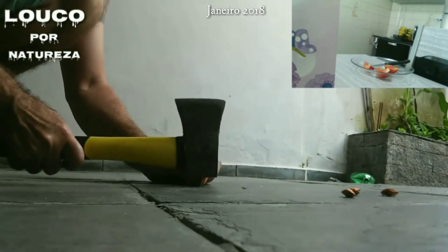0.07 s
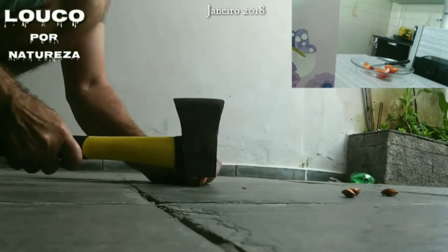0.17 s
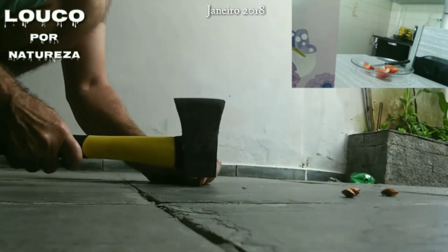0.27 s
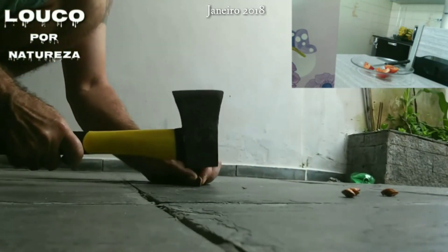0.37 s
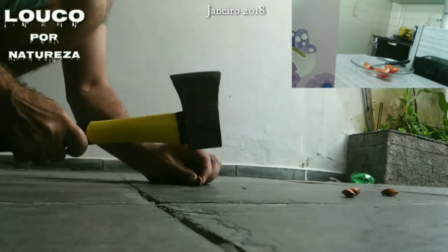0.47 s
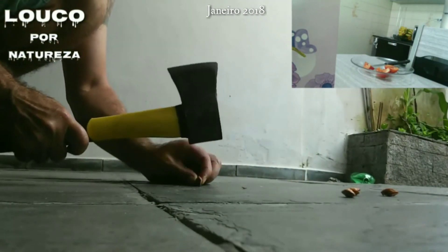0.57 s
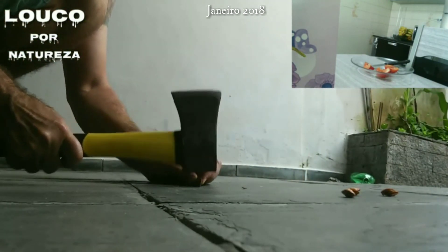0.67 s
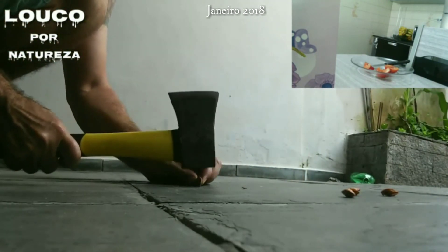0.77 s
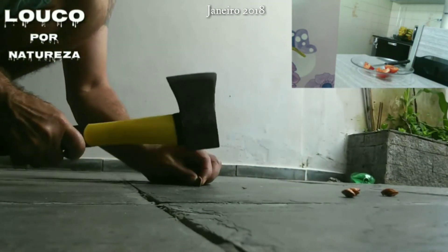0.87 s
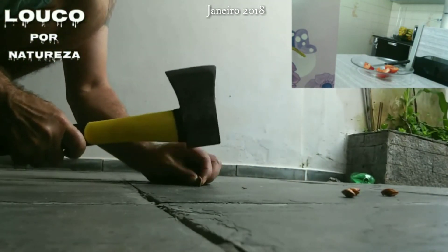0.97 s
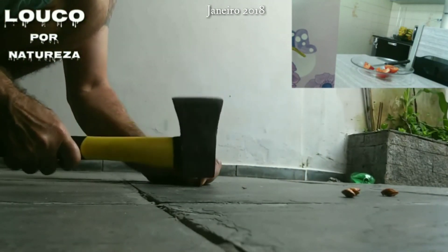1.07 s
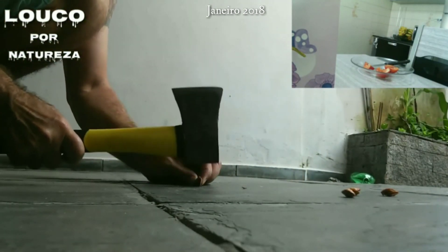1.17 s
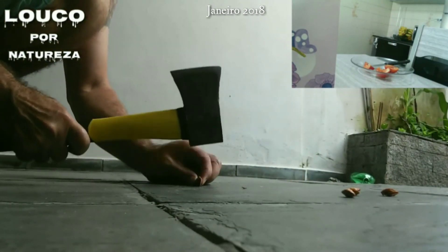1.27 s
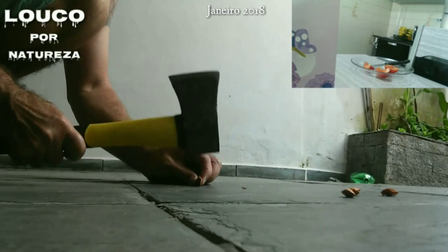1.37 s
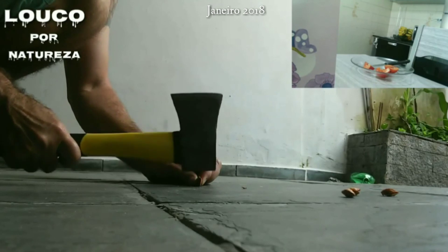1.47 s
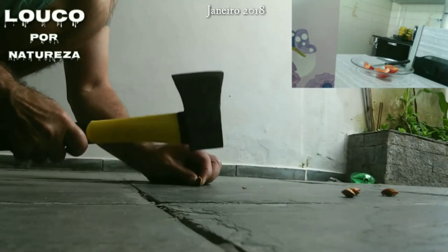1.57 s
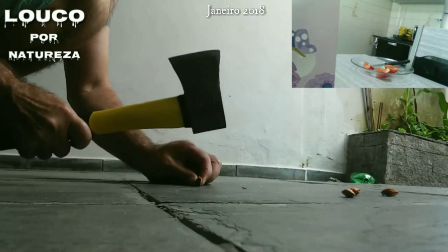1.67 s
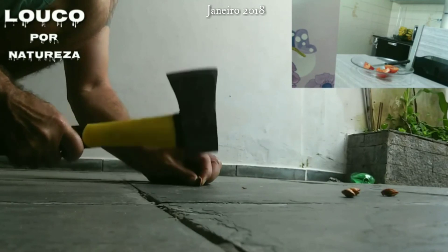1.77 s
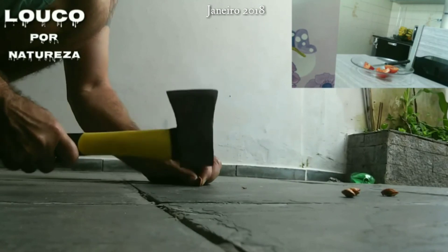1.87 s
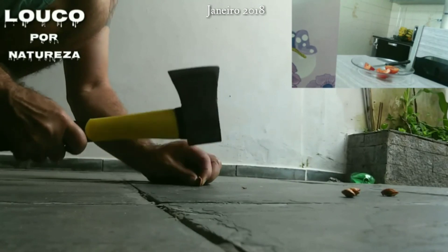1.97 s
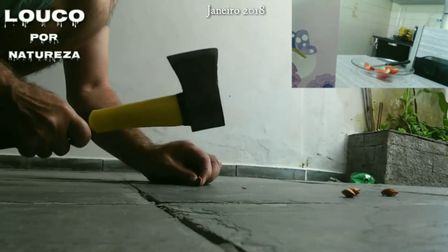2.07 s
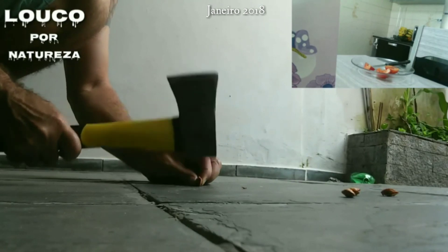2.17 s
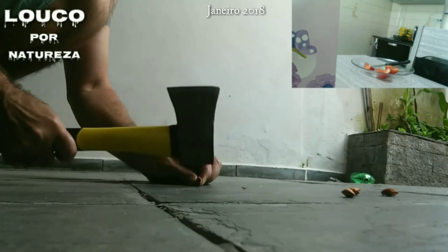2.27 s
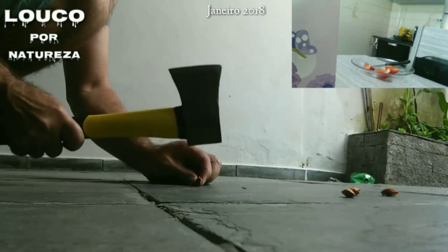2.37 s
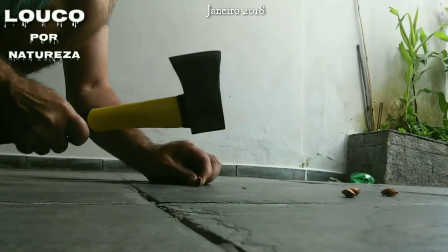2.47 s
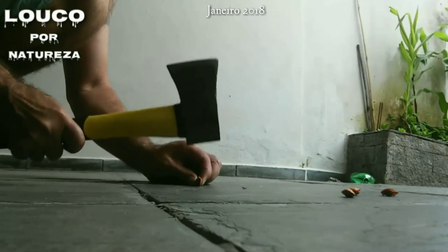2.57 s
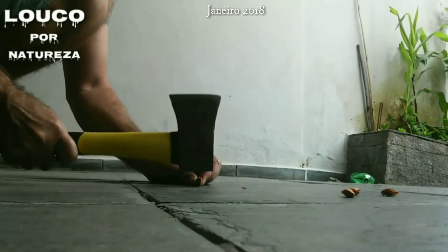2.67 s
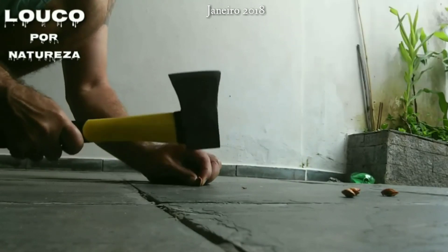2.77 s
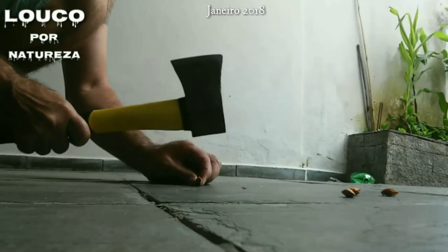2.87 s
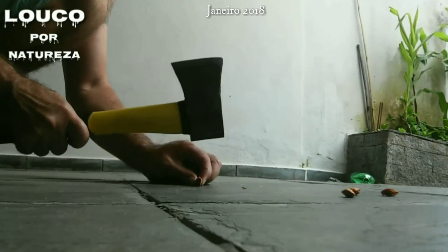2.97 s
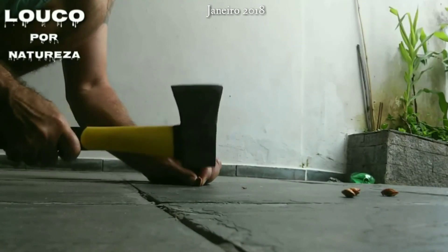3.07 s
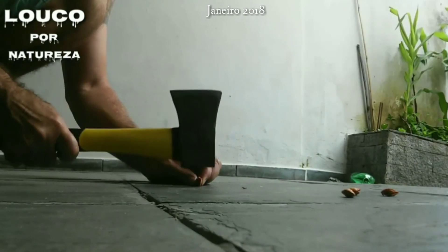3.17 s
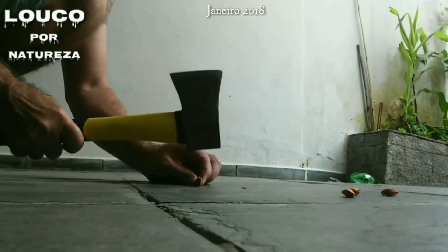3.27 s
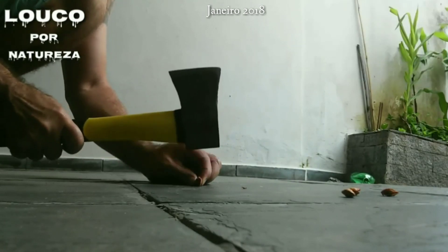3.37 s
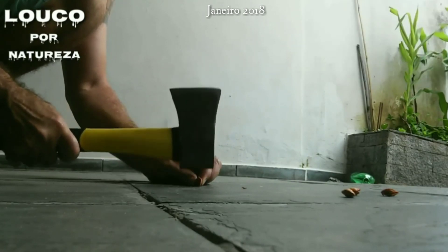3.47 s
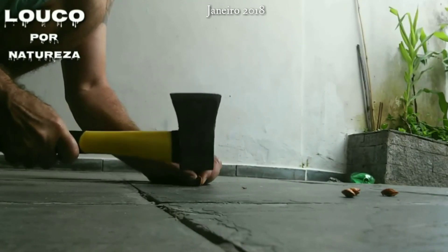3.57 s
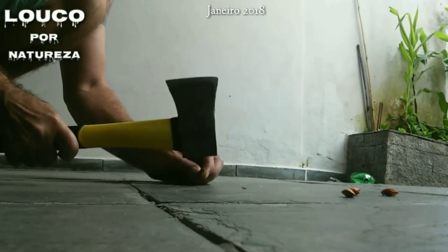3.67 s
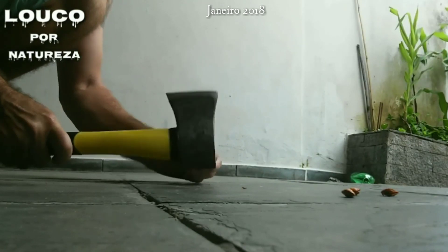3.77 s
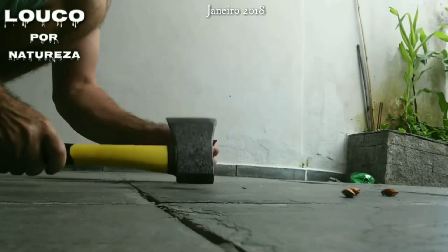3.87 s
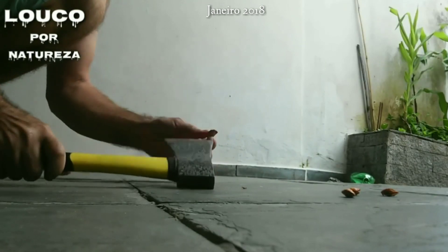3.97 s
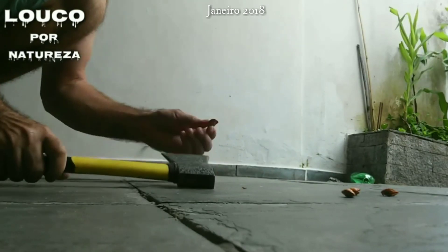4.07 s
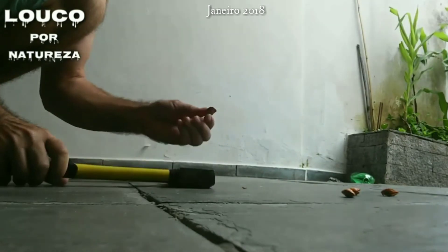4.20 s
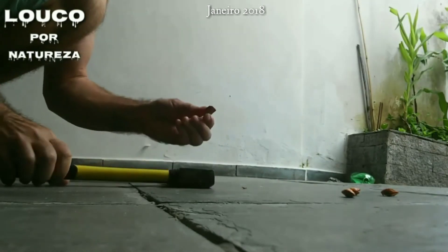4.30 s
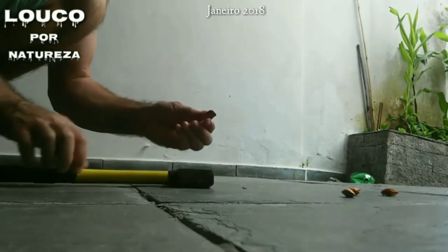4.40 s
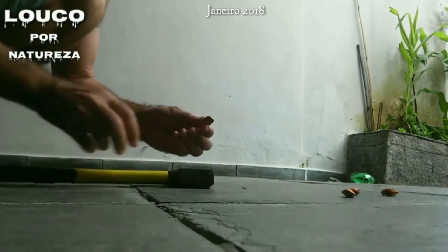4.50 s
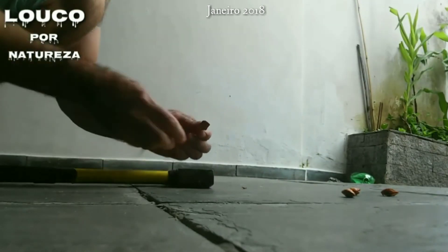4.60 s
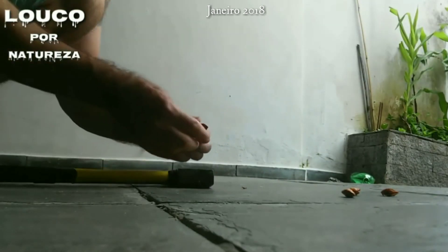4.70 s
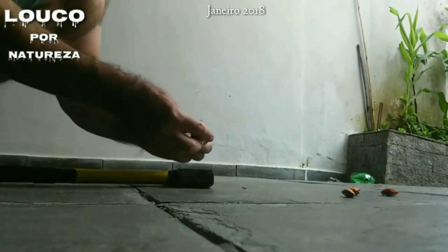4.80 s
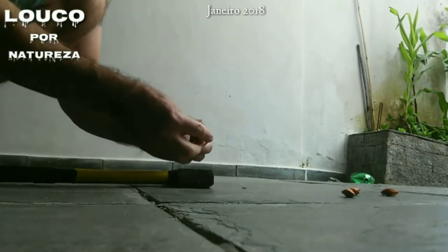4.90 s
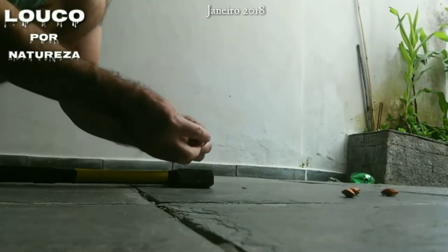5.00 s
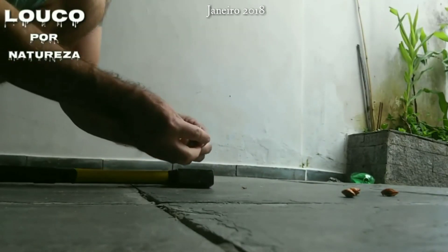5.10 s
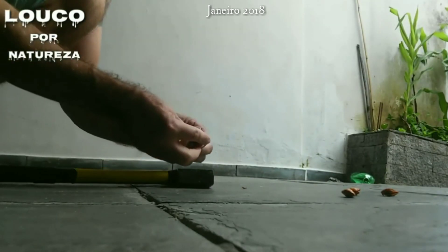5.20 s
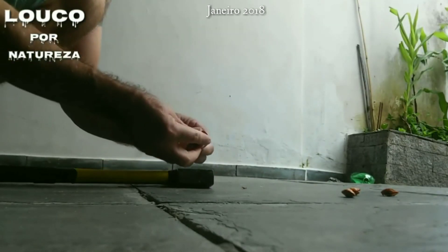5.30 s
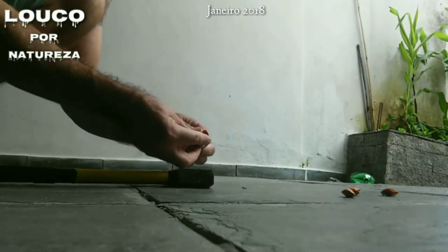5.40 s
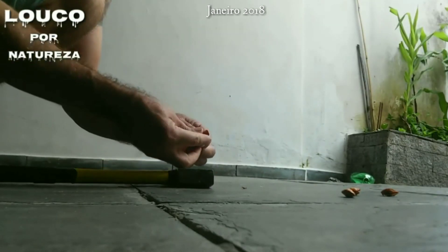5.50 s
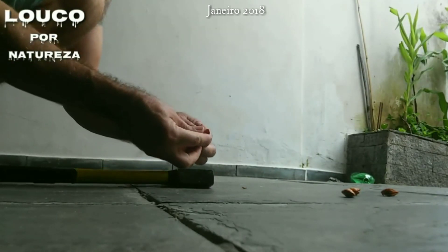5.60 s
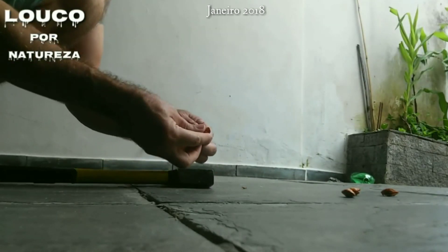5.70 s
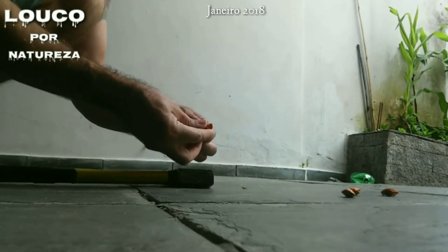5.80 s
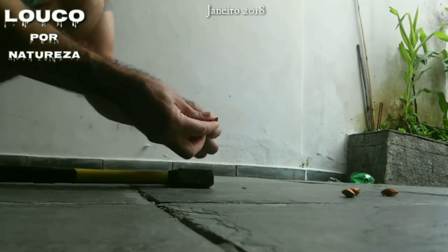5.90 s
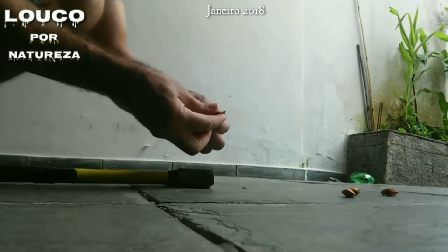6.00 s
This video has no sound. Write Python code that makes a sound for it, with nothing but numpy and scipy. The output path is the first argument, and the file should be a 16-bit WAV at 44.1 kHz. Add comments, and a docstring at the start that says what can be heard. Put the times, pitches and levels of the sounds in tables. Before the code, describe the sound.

A hatchet taps a fruit stone on tile, harder until the shell cracks, then is laid down with a steel clang.

```python
"""A small walled yard, one microphone near the tiled floor. A distant drone hums and fades away early on.
Close by, a hatchet's butt taps a fruit stone seven times: the slab knocks, the shell clicks, the walls
answer. The taps grow harder until the shell cracks under the fifth and sixth; the last is light.
Fingers pick at the shell. Then the hatchet is laid down: its steel head clangs flat on the tile and
chatters, and the handle knocks and rocks to rest."""
import sys
import numpy as np
from scipy import signal
from scipy.fft import rfft, irfft
from scipy.io import wavfile
from scipy.ndimage import uniform_filter1d, minimum_filter1d

SR = 44100
rng = np.random.default_rng(int(sys.argv[2]) if len(sys.argv) > 2 else 0)


def unload_audio(sound):
    """Save the sound as a 16-bit wav file, at the path given as the first command line argument."""
    columns = np.transpose(np.atleast_2d(sound))
    # keep every value between -1 and 1, then stretch to whole-number steps
    steps = np.round(np.clip(columns, -1, 1) * 32767)
    wavfile.write(sys.argv[1], SR, steps.astype(np.int16))


N = 266760
TIME, SCENE_HZ = np.arange(N) / SR, np.fft.rfftfreq(N, 1 / SR)
SIZE = 65536  # samples in one event with its echo
AGE, HZ = np.arange(SIZE) / SR, np.fft.rfftfreq(SIZE, 1 / SR)


def amp(db):
    """Decibels to gain."""
    return 10 ** (np.asarray(db) / 20)


def unit(x):
    """Scaled to rms 1."""
    return x / np.sqrt(np.mean(x ** 2) + 1e-20)


def burst(x):
    """Scaled to the energy of 8 ms at rms 1."""
    return x * np.sqrt(.008 * SR / np.sum(x ** 2))


def along(points, hz):
    """A curve through (Hz, value) points on a log frequency axis."""
    freqs, values = np.transpose(points)
    return np.interp(np.log(hz + 1), np.log(freqs), values)


def add(track, s, x):
    """Mix x into the track from time s."""
    part = track[round(s * SR):][:len(x)]
    part += x[:len(part)]


def resonance(hz, centre_hz, width_hz):
    """Response of one damped mode."""
    return 1j * hz * width_hz / (centre_hz ** 2 - hz ** 2 + 1j * hz * width_hz)


def lowpass(hz, cutoff_hz, order):
    """Treble roll-off; a softer contact lasts longer and has a lower cutoff."""
    return 1 / np.sqrt(1 + (hz / cutoff_hz) ** (2 * order))


def filtered(x, gain):
    """x through the causal filter that has this gain; x = [1.] is a single impulse."""
    cepstrum = irfft(np.log(np.maximum(abs(gain), 1e-6)))
    cepstrum[1:SIZE // 2] *= 2
    cepstrum[SIZE // 2 + 1:] = 0
    return irfft(rfft(x, SIZE) * np.exp(rfft(cepstrum)))


def ring(modes):
    """Damped modes, in new phases every time."""
    return sum(amp(db - 60 * AGE / t60) * np.sin(2 * np.pi * (hz * AGE + rng.random()))
               for hz, db, t60 in modes)


def noise(gain):
    """Steady noise of rms 1, coloured by a gain over SCENE_HZ."""
    return unit(irfft(rfft(rng.standard_normal(N)) * gain, N))


def fading(db, hold_s, fade_db_per_s):
    """A gain of db that falls steadily after hold_s."""
    return amp(db - fade_db_per_s * np.maximum(TIME - hold_s, 0))


# The air around the microphone. Each row: frequency in Hz, relative level in dB.
AIR_SPECTRUM = [(25, -11), (75, 3), (150, -4), (300, -11.5), (520, -10.5), (800, -13.5), (1300, -21.5),
                (4000, -29.5), (15000, -24.5)]

def still_air():
    """The faint, low noise of the empty yard."""
    return amp(-71.5) * noise(amp(along(AIR_SPECTRUM, SCENE_HZ)))


# The far-off hum, dipping and swelling twice. Each row: time in seconds, level in dB.
HUM_LEVELS = [(0.0, -35), (0.142, -51), (0.366, -34.5), (0.516, -44.5), (0.738, -38), (0.888, -51.5),
              (0.92, -61.5)]
# The rush that comes with it. Each row: frequency in Hz, relative level in dB.
RUSH_SPECTRUM = [(76, -27), (130, 0), (305, -7.5), (337, -12.5), (512, -5.5), (612, -10.5), (1090, -16.5),
                 (1330, -30.5), (1470, -20.5), (1790, -29), (2510, -25.5), (3250, -30), (5670, -32),
                 (6380, -37.5), (15000, -51)]

def drone():
    """In the distance a wavering hum, a rumble and a rush die away."""
    times, levels_db = np.transpose(HUM_LEVELS)
    hum_gain = fading(np.interp(TIME, times, levels_db), hold_s=times[-1], fade_db_per_s=21)
    pitch_hz = 103.3 + 4.5 * noise(lowpass(SCENE_HZ, cutoff_hz=8, order=3))
    hum = hum_gain * unit(np.sin(2 * np.pi * np.cumsum(pitch_hz) / SR))
    rumble = noise(resonance(SCENE_HZ, centre_hz=60, width_hz=36) ** 2)
    rumble *= fading(-49.5, hold_s=1.2, fade_db_per_s=12)
    rush = noise(amp(along(RUSH_SPECTRUM, SCENE_HZ))) * fading(-45, hold_s=.72, fade_db_per_s=20)
    return hum + rumble + rush


# The echo wash's final decay. Each row: frequency in Hz, time to fall 60 dB in seconds.
WASH_DECAY = [(100, .55), (300, .48), (600, .5), (1500, .5), (3000, .53), (6000, .49), (10000, .46),
              (15000, .41)]
# Its colour. Each row: frequency in Hz, relative level in dB.
WASH_SPECTRUM = [(50, 1), (150, 1.5), (300, -2), (600, -2), (1500, -2), (5000, -3), (10000, -2),
                 (15000, -9.5)]
# Waves standing between the walls. Each row: frequency in Hz, relative level in dB, t60 in seconds.
STANDING_WAVES = [(159, -1.5, 0.96), (235.6, -2.5, 0.85), (277, -3, 0.67), (323, -4, 0.1),
                  (369, -3.5, 0.73), (405, -2, 0.62), (493.6, 2.5, 0.73)]
# The nearest walls, heard from the microphone. Each row: delay in seconds, level in dB.
WALL_ECHOES = [(0.0127, -20), (0.0215, -15.5), (.0322, -18), (.047, -22.5)]

def yard(hold_s=0.091, standing_db=-6):
    """The yard as heard at the microphone: single wall echoes, standing waves and an echo wash."""
    hz, t, bands = signal.stft(rng.standard_normal(SIZE), SR, nperseg=256)
    # the wash holds its level briefly, as under automatic gain control, then dies away faster
    fall_db = -60 * (np.hypot(t, hold_s) - hold_s) / along(WASH_DECAY, hz)[:, None]
    bands *= amp(fall_db + along(WASH_SPECTRUM, hz)[:, None])
    tail = signal.istft(bands, SR, nperseg=256)[1][:SIZE]
    onset = 1 - np.exp(-(AGE / 0.005) ** 2)  # builds in about 5 ms
    wash, waves = rfft(tail * onset), rfft(ring(STANDING_WAVES) * onset)
    walls = sum(amp(db) * np.exp(-2j * np.pi * HZ * delay) for delay, db in WALL_ECHOES)
    walls *= lowpass(HZ, cutoff_hz=1500, order=1)
    return wash / wash[HZ < 11000].std() + amp(standing_db) * waves / waves[HZ < 600].std() + walls


def early_chirp(start_s=.007, length_s=.041, from_hz=135, to_hz=429, peak_db=2.5):
    """Spectrum of the yard's first low echoes, which crowd together into a short upward chirp."""
    progress = np.clip((AGE - start_s) / length_s, 0, 1)
    phase = 2 * np.pi * np.cumsum(from_hz + (to_hz - from_hz) * progress) / SR
    chirp = rfft(np.sin(np.pi * progress) * np.sin(phase))
    return amp(peak_db) * chirp / abs(chirp).max()


def echo(x, response, room_db):
    """What the yard gives back of x."""
    return amp(room_db) * irfft(rfft(x) * response)


def gritty(colour, grit_t60, room_db):
    """A dying flurry of tiny contacts: ragged straight to the microphone, evened out by the walls."""
    flurry = rng.standard_normal(SIZE) * amp(-60 * AGE / grit_t60)
    direct = burst(filtered(flurry, colour))
    smooth = burst(filtered([1.], colour))
    return direct + echo(smooth, yard(), room_db)


# Fingers and bits of shell, close by. Each row: start in seconds, length in seconds, level in dB,
# centre in Hz, width as a share of the centre.
FINGER_RUBS = [(0.096, 0.019, -37.5, 360, 0.26), (3.219, 0.067, -59.5, 1400, 1),
               (3.235, 0.023, -57, 4600, .03), (3.754, 0.018, -77, 7070, .5), (5.094, .11, -62, 1124, 0.71)]

def rubs():
    """Faint scrapes and a squeak as the fingers shift and pick at the shell."""
    out = np.zeros(N)
    for s, length_s, db, hz, width in FINGER_RUBS:
        colour = resonance(HZ, hz, width * hz) * lowpass(HZ, 2 * hz, order=1)
        friction = unit(filtered(rng.standard_normal(SIZE), colour))
        scrape = amp(db) * friction * np.sin(np.pi * np.minimum(AGE / length_s, 1))
        add(out, s, scrape + echo(scrape, yard(), room_db=-4.5))
    return out


def handle_rocking(start_s=4.63, rock_s=0.059, count=5, strongest_db=-24.5, loss_db=3.5):
    """The handle rocks at an even pace, shuddering in each rock, ever weaker after the second."""
    out = np.zeros(N)
    swell = np.sin(np.pi * np.minimum(AGE / rock_s, 1))
    for k in range(count):
        pitch_hz = 75.9 + 16.5 * 0.095 ** k  # starts sharp and settles
        phase = 2 * np.pi * pitch_hz * AGE
        tone = np.sin(phase) + amp(-17) * (np.sin(2 * phase) + np.sin(3 * phase))
        shudder = amp(strongest_db - loss_db * abs(k - 1)) * swell * tone
        add(out, start_s + k * rock_s, shudder + echo(shudder, yard(), room_db=-9.5))
    return out


# The handle meets the floor. Each row: start in seconds, level in dB.
HANDLE_LANDINGS = [(4.606, -36), (4.652, -36), (4.70, -31.5)]
# Its modes. Each row: frequency in Hz, relative level in dB, t60 in seconds.
HANDLE_MODES = [(204, -1.5, 1), (258, -5.5, 1), (432, -24, 0.31), (605, 13, 0.24), (627, 3.5, 0.6)]

def handle_knocks():
    """The let-go handle bumps on the floor and rings low."""
    out = np.zeros(N)
    for s, db in HANDLE_LANDINGS:
        bump = gritty(resonance(HZ, centre_hz=485, width_hz=1840) ** 2, grit_t60=0.0078, room_db=4.0)
        add(out, s, amp(db) * (bump + amp(-9.0) * ring(HANDLE_MODES)))
    return out


# The steel head meets the tile; the last row is the clack of the handle knocking down. Each row: start in
# seconds, clack level in dB, treble cutoff in Hz, # ring gain in dB.
HEAD_CONTACTS = [(4.1872, -46, 1750, -41), (4.409, -34, 1954, -39.5), (4.4259, -12.5, 14180, -11.5),
                 (4.606, -26, 2462, -51)]
# The clack of steel on tile. Each row: frequency in Hz, relative level in dB.
CLACK_SPECTRUM = [(60, -28.5), (150, -19.5), (300, -10.5), (500, -6), (900, -5), (1300, -6.5), (1850, -11),
                  (2600, 3.5), (3400, -6.5), (4900, 3.5), (6500, -7.5), (9000, -7.5), (12000, -13.5),
                  (16000, -15)]
# The head's modes. Each row: frequency in Hz, relative level in dB, t60 in seconds.
STEEL_MODES = [(2375, -10, .18), (2536, -7, .18), (2675, -11, .15), (2839, -6, .26), (2887, -5, .28),
               (2925, -7, .2), (3650, -10, .3), (4515, -15, .2), (6885, 3, .12), (6915, 1, .15),
               (8100, -13, .1), (11240, -1, .05), (11370, -2, .05), (13370, -10, .06)]

def steel_head(bounces=4, bounce_s=.0255, bounce_db=-18, loss_db=1.33, bounce_cutoff_hz=4500):
    """The steel touches down on an edge, falls flat with a clang and chatters in ever weaker bounces."""
    out = np.zeros(N)
    clang_s = max(HEAD_CONTACTS, key=lambda row: row[1])[0]
    chatter = [(clang_s + bounce_s * (k + 1), db, bounce_cutoff_hz, db - 4)
               for k, db in enumerate(bounce_db - loss_db * np.arange(bounces))]
    for s, clack_db, cutoff_hz, ring_db in HEAD_CONTACTS + chatter:
        colour = amp(along(CLACK_SPECTRUM, HZ)) * lowpass(HZ, cutoff_hz, order=4)
        clack = gritty(colour, grit_t60=0.019, room_db=3.0)
        steel = filtered(ring(STEEL_MODES), lowpass(HZ, cutoff_hz, order=3))
        clang = .5 * steel + echo(steel, yard(), room_db=-2)
        add(out, s, amp(clack_db) * clack + amp(ring_db) * clang)
    return out


# The broad snap of the fruit stone's shell. Each row: frequency in Hz, relative level in dB.
SNAP_SPECTRUM = [(300, -17.5), (1500, -1), (2300, -3), (3200, -1), (4100, -0.5), (5600, -2), (6500, -2),
                 (7800, -2), (10000, -4.5), (13000, -3.5), (16000, -21)]

def shell_colour(centre_hz, width_hz, mode_db=0, snap_db=0):
    """Spectrum of brittle shell: a broad snap and one resonance with no bass under it."""
    snap = unit(amp(along(SNAP_SPECTRUM, HZ)))
    bass_cut = 1 - lowpass(HZ, 0.57 * centre_hz, order=4)
    mode = unit(abs(resonance(HZ, centre_hz, width_hz)) * bass_cut)
    return np.hypot(amp(snap_db) * snap, amp(mode_db) * mode)


# The shell gives way. Each row: start in seconds, level in dB, centre in Hz, echo gain in dB.
SHELL_CRACKS = [(1.3123, -41.5, 2520, -4.5), (2.4457, -17.5, 5180, 9), (2.881, -16.5, 6700, 2)]

def cracks():
    """The shell creaks under an early tap and splits brightly under the two hardest blows."""
    out = np.zeros(N)
    for s, db, hz, room_db in SHELL_CRACKS:
        colour = shell_colour(hz, width_hz=.3 * hz, snap_db=-9.5)
        add(out, s, amp(db) * gritty(colour, grit_t60=0.012, room_db=room_db))
    return out


# The floor slab under the stone. Each row: frequency in Hz, relative level in dB.
SLAB_SPECTRUM = [(50, -24.5), (120, -11.5), (160, -6), (200, -10), (250, 1), (350, 2), (480, 2.5), (545, 1),
                 (620, -0.5), (1000, 2), (1600, 0.5), (2400, -8.5), (6000, -33.5)]
# The hatchet's butt lands on the stone, near the microphone. Each row: start in seconds,
# knock level in dB, contact time in seconds, shell click level in dB.
HATCHET_BLOWS = [(0.9297, -37.5, 0.00091, -44), (1.311, -29, 0.00095, -48), (1.6682, -19.5, .0018, -43),
                 (2.058, -16, 0.0013, -33.5), (2.4458, -14, 0.00084, -36), (2.8805, -15.5, 0.00082, -24.5),
                 (3.3508, -41, 0.0008, -44.5)]

def blows(shell_lag_s=.00052):
    """The stone passes each blow to the slab, which knocks and thuds; the shell clicks."""
    out = np.zeros(N)
    knock_yard = yard(hold_s=0.092, standing_db=-8) + early_chirp()
    thud_yard = yard(hold_s=.015, standing_db=-8) + early_chirp()
    thud_colour = resonance(HZ, centre_hz=256, width_hz=230) * lowpass(HZ, cutoff_hz=450, order=3)
    thud = burst(filtered([1.], thud_colour))
    thud += echo(thud, thud_yard, room_db=-1.5)
    click_colour = shell_colour(centre_hz=8750, width_hz=1100, mode_db=-6.5)
    for s, knock_db, contact_s, click_db in HATCHET_BLOWS:
        # the force is a half sine: the shorter the contact, the brighter the knock
        half_sine = np.sinc(HZ * contact_s - .5) + np.sinc(HZ * contact_s + .5)
        # the stone springs back unevenly, which fills the pulse's spectral nulls
        force = np.hypot(half_sine, amp(-18.5) * lowpass(HZ, 1.3 / contact_s, order=3))
        knock = amp(knock_db) * burst(filtered([1.], force * amp(along(SLAB_SPECTRUM, HZ))))
        thud_db = -28.5 + 0.14 * (knock_db + 19)  # the dull thud barely grows with the blow
        add(out, s, knock + echo(knock, knock_yard, room_db=0.5) + amp(thud_db) * thud)
        click = gritty(click_colour, grit_t60=.009, room_db=-1.5)
        add(out, s + shell_lag_s, amp(click_db) * click)
    return out


def scene():
    """Everything at one microphone near the floor."""
    cracking = blows() + cracks()
    laying_down = steel_head() + handle_knocks() + handle_rocking()
    return (cracking + laying_down + rubs() + drone() + still_air())[None]


def record(dry, ceiling=0.61, top_hz=15700):
    """Behind the microphone a fast limiter holds the peaks and a steep filter cuts the top treble."""
    needed = np.minimum(1, ceiling / (abs(dry) + 1e-9))
    gain = uniform_filter1d(minimum_filter1d(needed, size=31), size=31)
    return irfft(rfft(dry * gain) * lowpass(SCENE_HZ, top_hz, order=60), N)


dry = scene()
out = record(dry)
unload_audio(out)
```